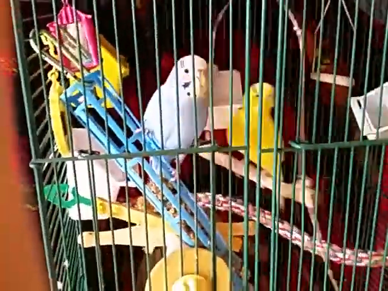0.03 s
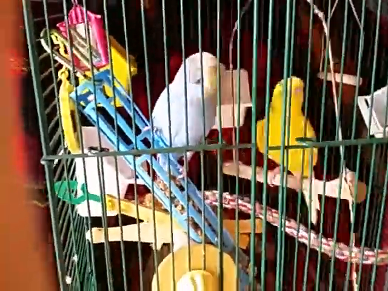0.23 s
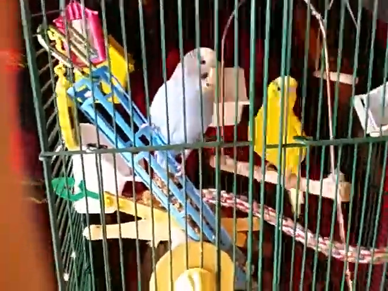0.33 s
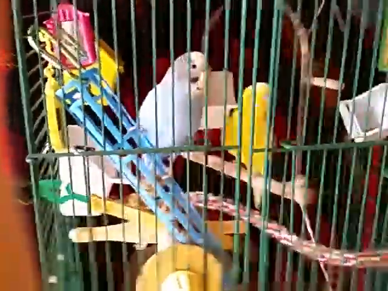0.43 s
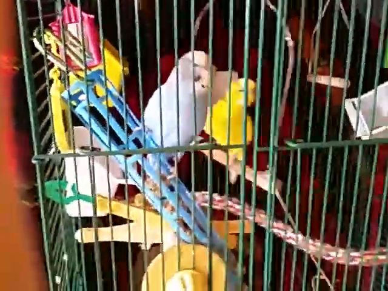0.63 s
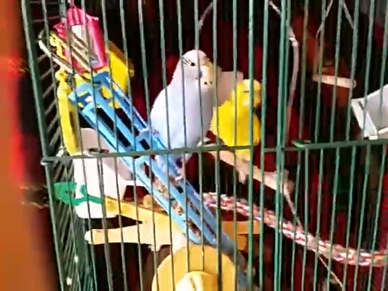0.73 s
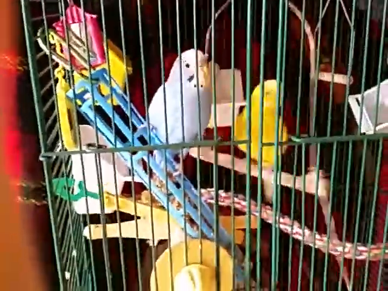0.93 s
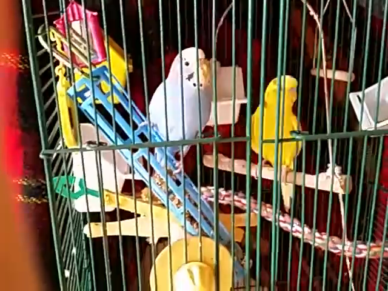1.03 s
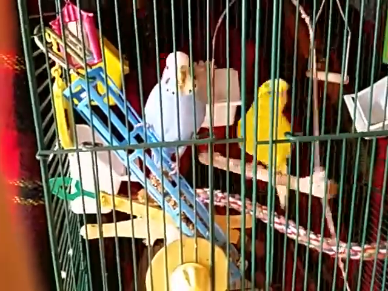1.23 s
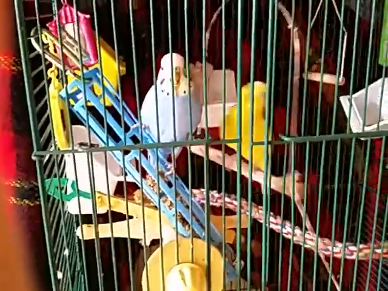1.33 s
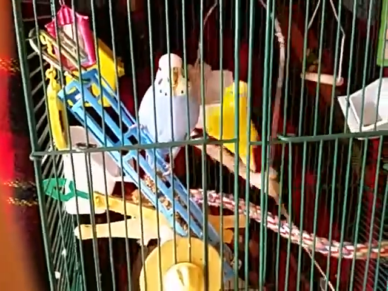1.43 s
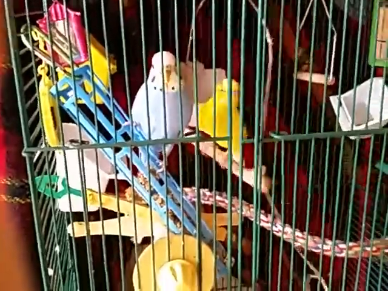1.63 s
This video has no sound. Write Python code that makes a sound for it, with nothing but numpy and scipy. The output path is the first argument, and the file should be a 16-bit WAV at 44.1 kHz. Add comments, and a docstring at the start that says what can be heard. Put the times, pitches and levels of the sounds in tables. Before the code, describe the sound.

Handling noise sounds right at the microphone: one dull thump, then a few lighter knocks with dry scuffs between them. Three small sharp ticks follow, over a low wavering hum in a quiet room.

```python
"""One dull thump and a few lighter knocks sound right at the microphone, with dry scuffs between them;
three small sharp ticks follow, over a low wavering hum and soft room noise. The knocks and scuffs are
most likely a hand shifting its grip on the recorder, beside a budgie cage in a quiet room. Each knock
is an impact that excites heavily damped modes, each scuff is friction made of many tiny catches, and
each tick is a hard snap that rings one short resonance."""
import sys
import numpy as np
from scipy import signal
from scipy.fft import rfft, irfft
from scipy.io import wavfile

SR = 44100
rng = np.random.default_rng(int(sys.argv[2]) if len(sys.argv) > 2 else 0)


def bounce(signal):
    """Save signal as a 16-bit WAV file at the path given by the first command-line argument."""
    frames = np.transpose(np.atleast_2d(signal))
    limited = np.clip(frames, -1, 1)
    pcm = np.round(limited * 32767).astype(np.int16)
    wavfile.write(sys.argv[1], SR, pcm)


N = 74970

# spectrum of low rubbing noise: frequency_hz, relative_db
RUB_SPECTRUM = [(90, -20), (220, -8.5), (380, 7), (620, 1.5), (800, -4.5), (1000, -17), (2000, -49.5)]
# spectrum of high hiss: frequency_hz, relative_db
HISS_SPECTRUM = [(4000, -41), (6800, -33.5), (7800, -34.5), (9600, -28.5), (10300, -11), (11000, 2.5),
                 (12000, -5), (13300, 0), (15800, -5.5)]


def knocks():
    """Impact excitation: force pulses drive damped modes, with bursts of noise and a faint wiry ring."""
    # impacts: start_s, thud_db, crack_db, fizz_db, crack_pan_db, contact_s
    impacts = [(0.2069, -12, -43.5, -56, 4.5, 0.0012), (0.2226, -31, -62, -66, 0, .0013),
               (0.3218, -42.5, -61.5, -76, 2, 0.00064), (0.3629, -42.5, -56, -59, 0.5, 0.00071),
               (0.386, -43, -83, -87, 1, 0.0021), (0.5053, -33, -62.5, -59.5, 6.5, .0015),
               (0.5100, -44.5, -88, -62, 9, 0.00078), (0.6420, -40, -73.5, -76, 4, 0.0013),
               (0.6585, -43.5, -73, -76, 2, 0.00052), (0.7052, -33, -59, -87, 15, 0.0011)]
    # modes of the struck body: frequency_hz, t60_s, left_db, right_db
    modes = [(143, 0.042, -3, -11.5), (203, 0.0227, 0, -15), (358, 0.014, -4.5, -26),
             (556, 0.032, -3.5, -40), (610, 0.046, -11.5, -38)]
    # spectrum of the contact crack: frequency_hz, relative_db
    crack_spectrum = [(300, 2), (800, -11), (1200, 4.5), (1500, 0), (1900, 6), (2450, -10.5), (3000, -2.5),
                      (4100, -13), (4900, -23.5), (6000, -20.5), (7000, -39), (8500, -19.5), (11000, -40)]
    t = clock()
    body = sum(undb([[left_db], [right_db]]) * -np.cos(2 * np.pi * hz * t) * decay(0, t60_s)
               for hz, t60_s, left_db, right_db in modes)
    body = butterworth(body, order=1, hz=65, kind="high")
    force = crack = fizz = ring = wire = 0
    for start_s, thud_db, crack_db, fizz_db, crack_pan_db, contact_s in impacts:
        # a longer contact spreads the same impulse out and sounds duller
        pulse = np.exp(-np.pi * ((t - start_s) / contact_s - 1) ** 2) / (contact_s * SR)
        force += undb(thud_db) * pulse
        crack += undb(crack_db) * pan(crack_pan_db) * decay(start_s, t60_s=0.013)
        fizz += undb(fizz_db) * decay(start_s, t60_s=0.014)
        ring += undb(thud_db - 30.5) * decay(start_s, t60_s=0.046)
        wire += undb(crack_db - 28.5) * decay(start_s, t60_s=0.38)
    thuds = signal.fftconvolve(force[None], body, axes=1)[:, :N]
    return (thuds
            + colour(crack * noise(correlation=0.21), crack_spectrum)
            + hiss(fizz, pan_db=-17)
            + colour(ring * noise(correlation=0.95), RUB_SPECTRUM)
            + colour(wire * noise(correlation=0.33), resonance(hz=3900, width_hz=190)))


def scuffs():
    """Dry friction: tiny catches of uneven strength modulate a low rub, a rasp and a high hiss."""
    # sliding strokes: start_s, rise_s, fall_s, rub_db, rasp_db, hiss_db
    strokes = [(0.189, 0.096, 0.025, -65, -70.5, -68.5), (0.285, 0.033, 0.15, -67, -80, -76),
               (0.368, 0.043, 0.06, -63, -68, -71), (0.482, 0.032, 0.097, -61, -67.5, -65.5),
               (0.625, 0.048, 0.08, -57.5, -69, -74), (0.68, 0.07, 0.093, -64.5, -71.5, -81.5),
               (1.04, 0.034, 0.018, -76, -83, -88), (1.405, 0.0093, 0.072, -91, -87, -75),
               (1.509, 0.02, 0.039, -88, -86, -78.5)]
    # spectrum of the rasp: frequency_hz, relative_db
    rasp_spectrum = [(500, -15.5), (950, 3), (1900, -0.5), (2500, -9.5), (3900, -9.5), (4800, -20),
                     (6300, -31), (7600, -18), (9200, -21), (12000, -46)]
    catches_per_s, spread_db = 600, 2
    catch_index = np.cumsum(rng.random(N) < catches_per_s / SR)
    grit = unit_power(undb(spread_db * rng.standard_normal(N + 1))[catch_index])
    rub, rasp, high = sum(undb(levels_db)[:, None] * slide(start_s, rise_s, fall_s)
                          for start_s, rise_s, fall_s, *levels_db in strokes)
    return (colour(grit * rub * noise(correlation=0.73), RUB_SPECTRUM) * pan(10.5)
            + colour(grit * rasp * noise(correlation=0.13), rasp_spectrum) * pan(4)
            + hiss(np.sqrt(grit) * high, pan_db=-17))


def slide(start_s, rise_s, fall_s):
    """Friction noise follows sliding speed: the envelope of one scuff builds up and eases off."""
    age = clock() - start_s
    ramp = np.minimum(age / rise_s, (rise_s + fall_s - age) / fall_s)
    return np.clip(ramp, 0, 1) ** 1.175


def ticks():
    """Free decay: each hard snap rings one resonance, with a scratch, a faint tail and a bright fizz."""
    # snaps, three strong and three faint: start_s, ring_db, fizz_db, fizz_cutoff_hz
    snaps = [(1.4060, -56, -47, 19000), (1.486, -52.5, -53.5, 11500), (1.5007, -58.5, -60, 11500),
             (1.5100, -66, -82, 11500), (1.525, -65, -75, 11500), (1.5370, -70.5, -80, 11510)]
    ring_hz, ring_t60_s = 1950, 0.0054
    ring = scratch = tail = fizz = 0
    for start_s, ring_db, fizz_db, fizz_cutoff_hz in snaps:
        envelope = undb(ring_db) * decay(start_s, ring_t60_s)
        ring += envelope * np.sin(2 * np.pi * ring_hz * (clock() - start_s))
        scratch += envelope * undb(-11.5)
        tail += undb(ring_db - 27.5) * decay(start_s, t60_s=0.13)
        burst = hiss(undb(fizz_db) * decay(start_s, t60_s=0.0056), pan_db=-16)
        fizz += butterworth(burst, order=3, hz=fizz_cutoff_hz, kind="low")
    ring = butterworth(ring, order=1, hz=[ring_hz / 1.01, ring_hz * 1.12], kind="band")
    ring_noise = colour((scratch + tail) * noise(correlation=0.18), resonance(ring_hz, width_hz=260))
    return (ring + ring_noise) * pan(10) + fizz


def hiss(envelope, pan_db):
    """Friction noise: a bright band placed by pan_db, and a softer, lower whisper on the left."""
    bright = colour(envelope * noise(), HISS_SPECTRUM)
    whisper = colour(envelope * noise(), resonance(hz=8020, width_hz=750)) * undb(-24.5)
    return bright * pan(pan_db) + whisper * pan(10)


def hum():
    """Amplitude and frequency modulation: a low machine-like tone wavers, reaching the left later."""
    # course of the hum: time_s, level_db, pitch_hz
    course = [(0.0, -47, 79.6), (0.316, -50.5, 80.63), (0.624, -50.5, 82.4), (0.666, -47.5, 82.3),
              (0.994, -47, 80.8), (1.136, -59.5, 81.54), (1.174, -55.5, 80.8), (1.496, -53, 82.06),
              (1.556, -61.5, 81.2), (1.67, -48.5, 79.5), (1.7, -47.5, 81.95)]
    delay_s = np.array([[0.0001], [0]])
    pitch_hz = curve(course, column=2)
    phase = 2 * np.pi * (np.cumsum(pitch_hz) / SR - pitch_hz * delay_s)
    return np.sqrt(2) * np.sin(phase) * undb(curve(course) - 0.5) * pan(-4.5)


def room():
    """Partly coherent noise: a soft rumble, most alike on both sides in the bass, under thin air."""
    # spectrum of the room noise: frequency_hz, relative_db
    rumble_spectrum = [(25, -22.5), (42, -1.5), (60, 7.5), (85, 5.5), (120, -4), (170, -6), (260, -11),
                       (480, -19), (750, -29), (1400, -36.5), (1950, -36), (2400, -44), (3600, -45.5),
                       (5400, -54), (16000, -53)]
    # envelope of the rumble: time_s, level_db
    rumble_levels = [(0, -53.5), (0.2, -61), (0.7, -56), (1.05, -55.5), (1.12, -59.5), (1.35, -61.5),
                     (1.7, -63)]
    # envelope of the thin high air: time_s, level_db
    air_levels = [(0, -91.5), (0.2, -89), (0.27, -81), (0.75, -83), (1.12, -91), (1.39, -95.5), (1.43, -78),
                  (1.6, -88), (1.7, -91)]
    bin_hz = np.arange(N // 2 + 1) * SR / N
    stereo_width = np.clip(bin_hz / 1110, 0.35, 0.85)
    mid, side = rfft(noise()) * response(rumble_spectrum)
    rumble = irfft([mid + stereo_width * side, mid - stereo_width * side], N)
    air = colour(noise(), HISS_SPECTRUM)
    return rumble * undb(curve(rumble_levels)) * pan(-3) + air * undb(curve(air_levels))


def undb(db):
    """Amplitude ratio for a level in decibels."""
    return 10 ** (np.asarray(db) / 20)


def clock():
    """Time of each sample in seconds."""
    return np.arange(N) / SR


def curve(rows, column=1):
    """Linear interpolation of one table column over time."""
    rows = np.array(rows)
    return np.interp(clock(), rows[:, 0], rows[:, column])


def pan(db):
    """Left and right gains for a level difference; positive is to the left."""
    return undb(np.array([[db], [-db]]) / 2)


def decay(start_s, t60_s):
    """Exponential damping: a sudden onset that falls 60 dB in t60_s."""
    age = clock() - start_s
    return (age >= 0) * np.exp(-np.log(1000) * np.maximum(age, 0) / t60_s)


def noise(correlation=0):
    """Stereo white noise, correlated through a part common to both sides."""
    common = np.sqrt(correlation) * rng.standard_normal(N)
    return common + np.sqrt(1 - correlation) * rng.standard_normal((2, N))


def unit_power(x):
    """Normalisation to a mean square of one."""
    return x / np.sqrt(np.mean(x ** 2))


def resonance(hz, width_hz):
    """Spectrum of one resonant peak, 8 dB down at width_hz to either side."""
    return [(hz / 2, -35), (hz - width_hz, -8), (hz, 0), (hz + width_hz, -8),
            (hz * 1.64, -32), (hz * 3, -55)]


def response(spectrum):
    """Magnitude response of unit power through (frequency_hz, relative_db) points."""
    hz, db = np.array(spectrum).T
    bin_hz = np.arange(N // 2 + 1) * SR / N
    return unit_power(undb(np.interp(np.log(bin_hz + 1), np.log(hz), db)))


def colour(x, spectrum):
    """Minimum-phase filtering: folding the cepstrum makes the response causal."""
    cepstrum = irfft(np.log(response(spectrum)), N)
    cepstrum[1:N // 2] *= 2
    cepstrum[N // 2 + 1:] = 0
    return irfft(rfft(x) * np.exp(rfft(cepstrum)), N)


def butterworth(x, order, hz, kind):
    """Filtering with a maximally flat passband."""
    return signal.sosfilt(signal.butter(order, hz, kind, fs=SR, output="sos"), x)


def scene():
    """Superposition: all sources add at the microphone."""
    return knocks() + scuffs() + ticks() + hum() + room()


def record(dry):
    """Band limiting: a steep low-pass filter cuts the highest treble."""
    cutoff_hz = 16000
    return signal.sosfilt(signal.ellip(10, 0.2, 70, cutoff_hz, fs=SR, output="sos"), dry)


dry = scene()
out = record(dry)
bounce(out)
```